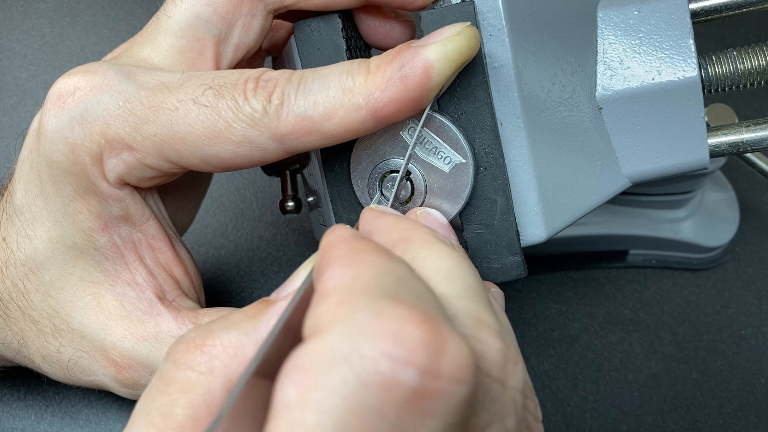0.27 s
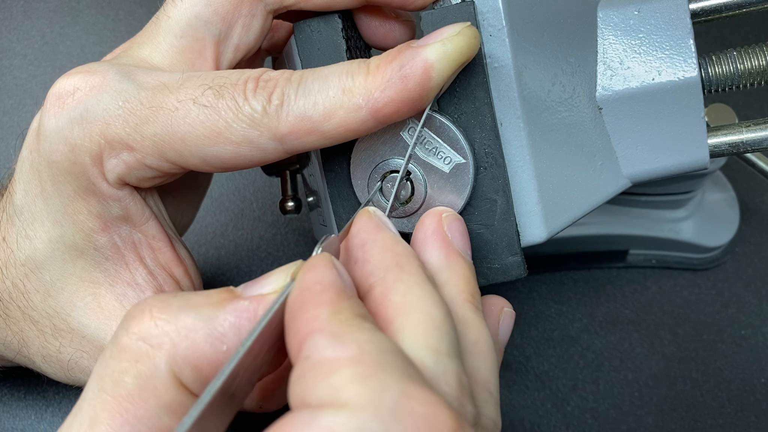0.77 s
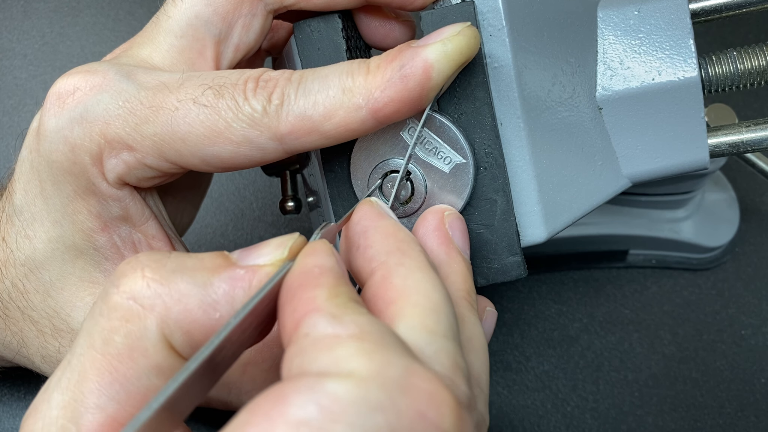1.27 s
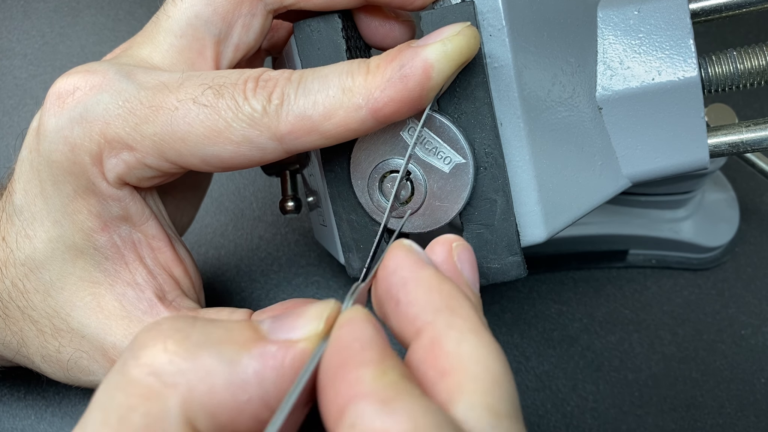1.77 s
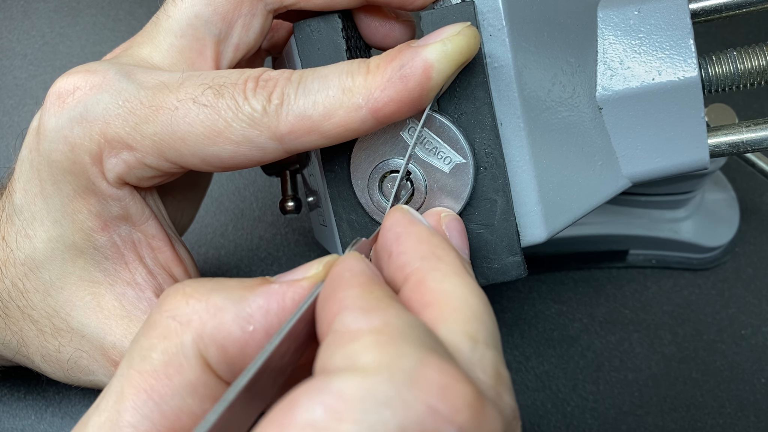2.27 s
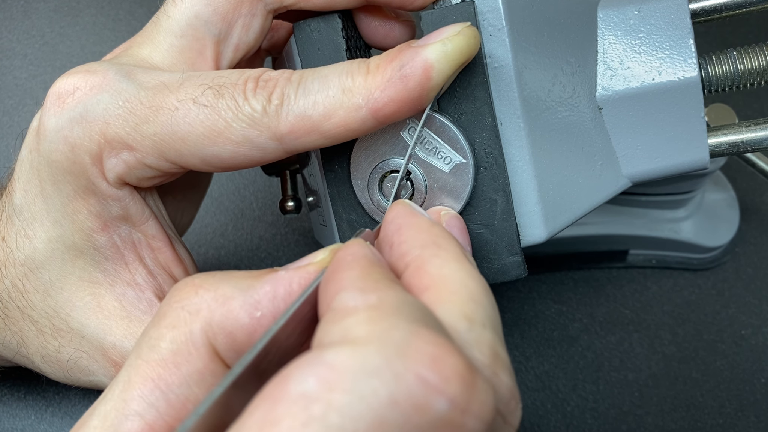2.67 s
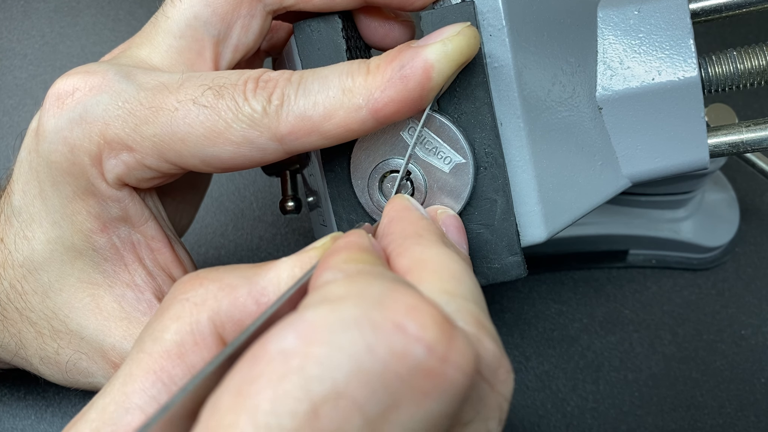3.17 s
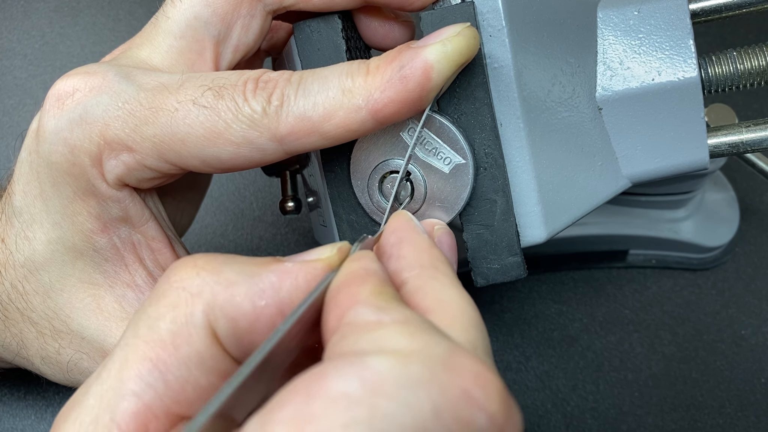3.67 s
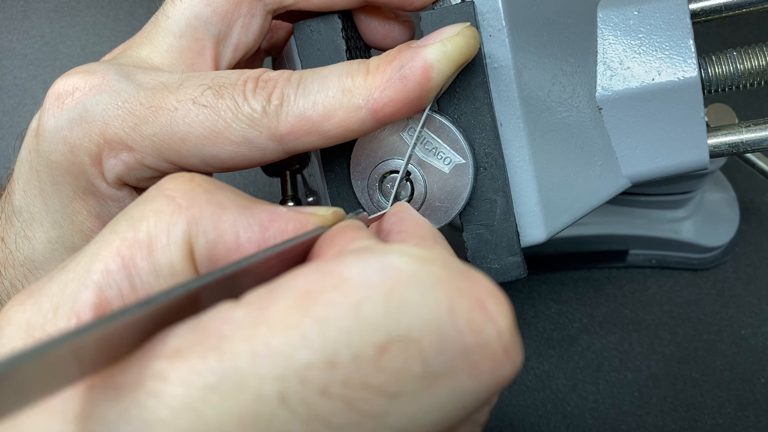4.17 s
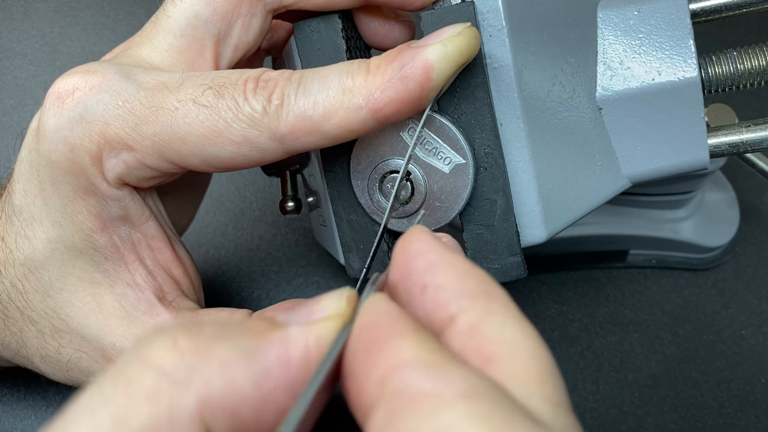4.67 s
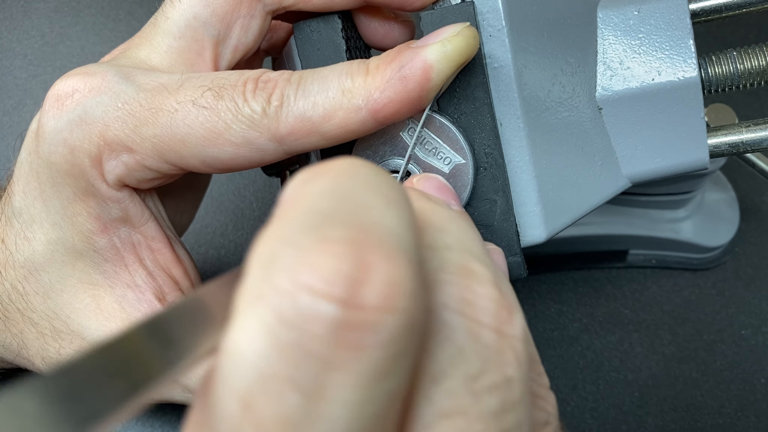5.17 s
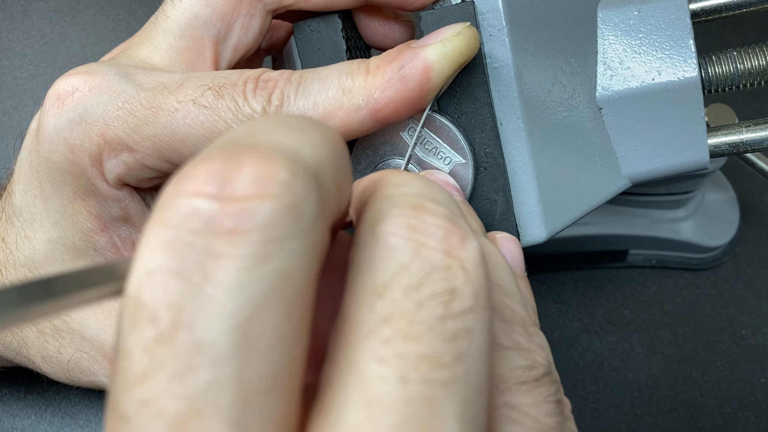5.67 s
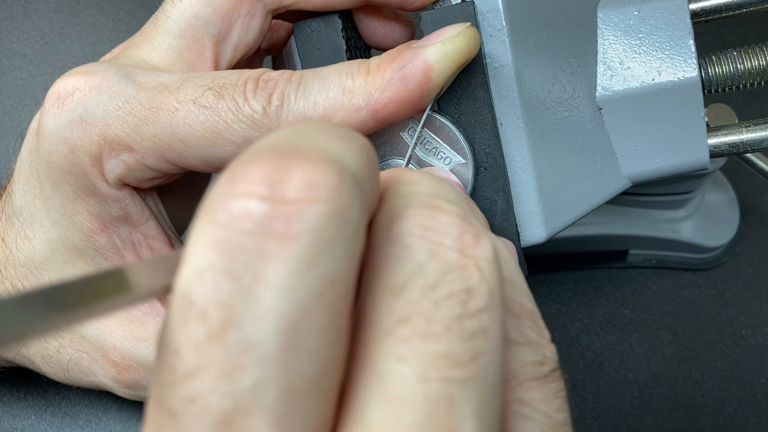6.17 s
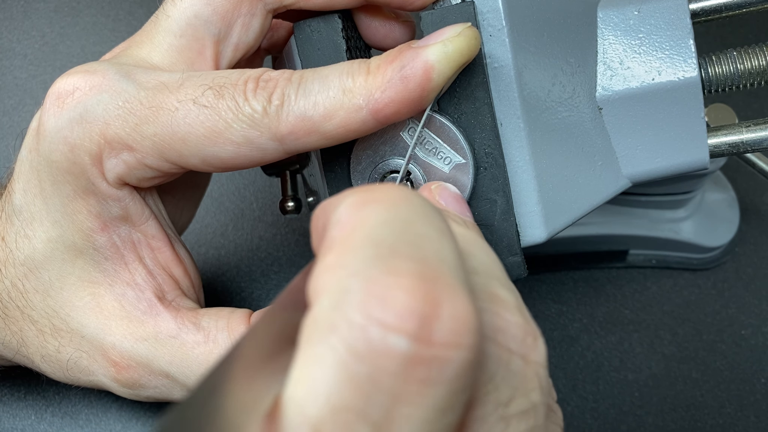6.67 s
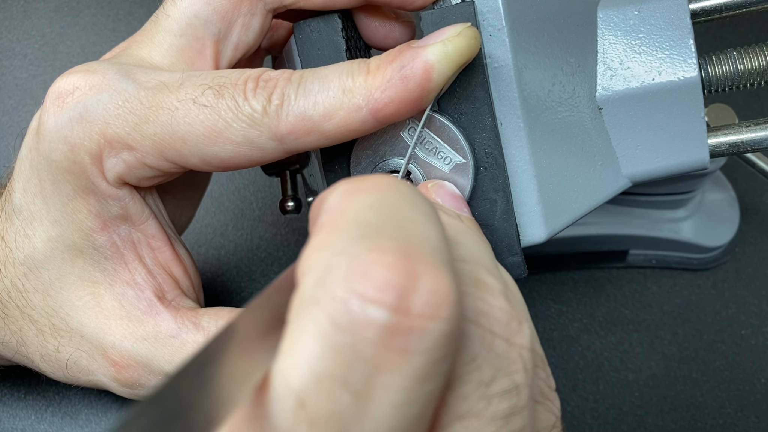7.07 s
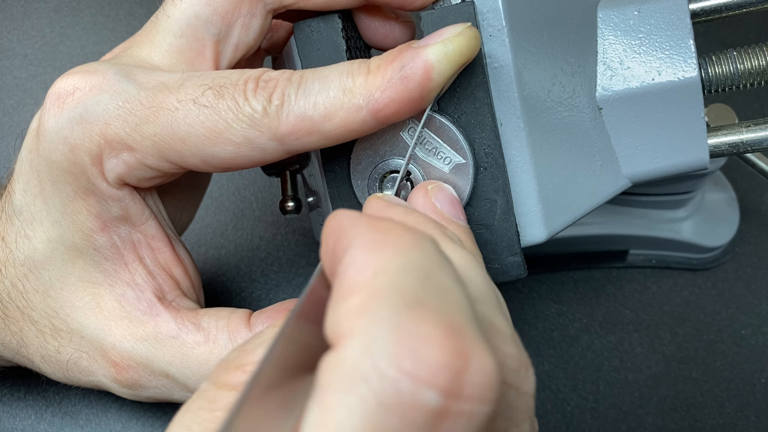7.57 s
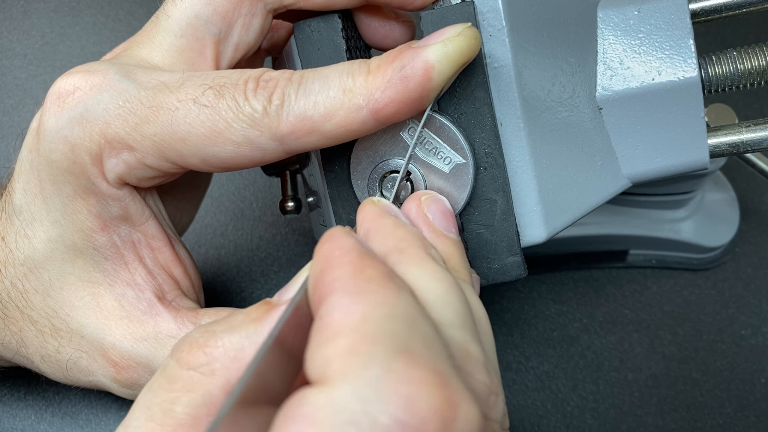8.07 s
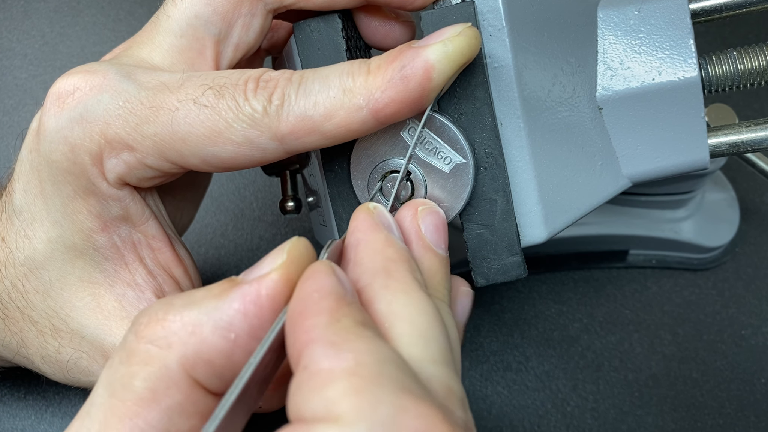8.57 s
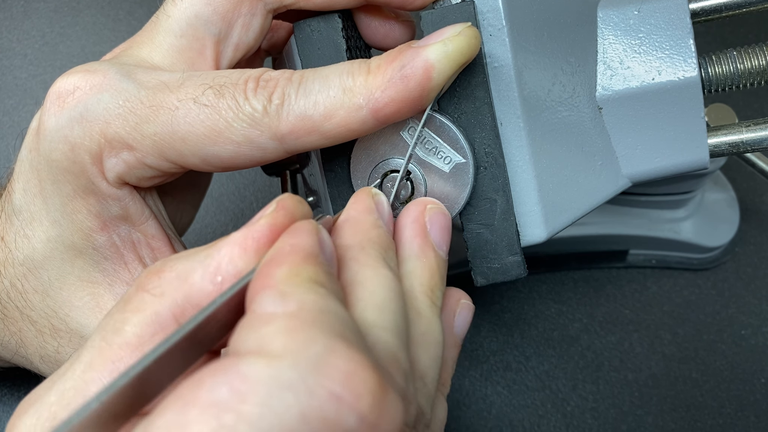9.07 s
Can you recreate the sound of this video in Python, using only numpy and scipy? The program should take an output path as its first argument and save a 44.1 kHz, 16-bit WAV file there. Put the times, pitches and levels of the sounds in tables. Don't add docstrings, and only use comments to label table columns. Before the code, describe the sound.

Small sharp lock clicks and tiny ticks come unevenly over a low bench rumble, with one heavy thump and then the loudest snap late on.

```python
import sys
import numpy as np
from scipy import signal
from scipy.fft import rfft, irfft
from scipy.io import wavfile
from scipy.ndimage import uniform_filter1d

SR = 44100
rng = np.random.default_rng(int(sys.argv[2]) if len(sys.argv) > 2 else 0)


def master_out(mix):
    frames = np.transpose(np.atleast_2d(mix))
    ceiling = np.clip(frames, -1, 1)
    pcm = np.round(ceiling * 32767).astype(np.int16)
    wavfile.write(sys.argv[1], SR, pcm)


def natural_amplitude(level_db):
    exponent = np.asarray(level_db, float) / 20
    return 10 ** exponent


N = 411453

# f/Hz, density/dB
AIR_SPECTRUM = [(59, -58), (100, -0.5), (126, -6.5), (163, -12.5), (238, -10.5), (306, -14.5), (603, -22),
                (919, -25.5), (1290, -27.5), (1590, -30.5), (15600, -38)]
SWAY_SPECTRUM = [(8.8, -22.5), (15, -1.5), (38, 1.5), (54, -9.5), (76, 0.5), (97, -17), (110, -21.5),
                 (140, -56), (240, -120)]
# f/Hz, width/Hz, level/dB
WHINE = (12750, 150, -96)
# t/s, level/dB
HAND_PRESSURE = [(0.0, -59.5), (0.26, -62), (0.57, -60), (1.01, -62.5), (1.32, -67), (2.41, -61.5),
                 (3.17, -65.5), (3.66, -57.5), (3.87, -63.5), (4.34, -65), (4.49, -50), (4.7, -63),
                 (5.9, -63), (6.21, -61), (6.65, -65), (7.51, -63.5), (7.74, -61), (9.33, -62)]
# f/Hz, level/dB, t60/s
TABLE_MODES = [(79, -16, 0.25), (122, 0, 0.24)]
STEEL_MODES = [(4080, -1, .004), (4900, -2, .003), (6100, -1, .005), (7000, -2, .004), (8250, -6, .003),
               (9500, -9, .003), (11500, -10, .003), (13200, -13, .003), (15000, -15, .003)]
LOCK_MODES = [(1290, -15, .01), (1498, -12, .012), (1611, -3, .028), (1860, -3, .012), (2032, -4, .015),
              (2320, -3, .01), (2600, -6, .008), (2976, -7, .01), (3265, -10, .008)]
VISE_MODES = [(466, -8.5, 0.049), (654, -7.5, 0.027), (814, 2.5, 0.017), (894.6, 7.5, 0.018),
              (969, -15.5, 0.09), (1014, -15, 0.054)]
STAND_MODES = [(79, 7, 0.027), (184.3, -8.5, 0.072), (212.3, 4.5, 0.047), (318, -7.5, 0.11),
               (344, -10, 0.04), (384, -1.5, 0.024)]
LEG_MODES = [(32.3, -1.5, 0.7), (56.3, 5.5, 0.3), (72.4, 8, 0.25)]
# f/Hz, t60/s
ROOM_DECAY = [(100, 0.43), (500, 0.29), (2000, 0.28), (6000, 0.23), (15000, 0.11)]
# t/s, vise level/dB, lock level/dB, steel level/dB, table level/dB
SETS = [(0.177, -54.5, -51.5, -83, -53.5), (0.3481, -47, -44.5, -43.5, -39),
        (0.9685, -51.5, -51.5, -59, -56), (1.348, -53.5, -51.5, -81, -53), (1.532, -54.5, -49, -44, -44),
        (1.96, -41.5, -50.5, -37, -42.5), (2.4215, -39.5, -40.5, -41.5, -40.5),
        (2.828, -58.5, -53, -71, -74), (3.5238, -39.5, -47.5, -46.5, -43.5),
        (3.5969, -33.5, -46, -41.5, -58), (3.9832, -44.5, -40.5, -52, -48.5), (4.331, -39, -40, -48.5, -41),
        (4.4996, -63, -60, -45.5, -40.5), (5.476, -40.5, -43, -48, -39.5), (5.801, -47.5, -46, -57, -45),
        (6.0565, -32, -38, -41, -22), (6.9678, -43.5, -42, -56.5, -44.5),
        (7.2396, -29, -21.5, -26.5, -21.5), (7.3625, -45, -41, -42, -43), (7.783, -47.5, -50.5, -52, -43.5),
        (8.0053, -54, -53.5, -94, -53), (8.2505, -52, -47, -50.5, -41), (8.752, -57.5, -51, -52, -41.5),
        (9.192, -53.5, -50.5, -41, -39.5)]
# t/s, vise level/dB, steel level/dB, table level/dB
REBOUNDS = [(0.2106, -59, -65, -60), (1.5652, -69, -56, -49), (2.0129, -43.5, -55, -54),
            (2.0632, -49, -73, -67), (2.0769, -60, -62, -61), (2.1106, -64, -54.5, -69),
            (3.5468, -58, -71, -46.5), (3.612, -62, -70, -52), (4.5053, -50.5, -64, -46),
            (6.106, -54, -81, -47), (6.1608, -64, -65, -38), (6.1807, -62, -72, -37),
            (7.255, -48, -47, -39), (7.3769, -51, -72, -36), (9.2305, -56.5, -46.5, -45)]
# t/s, vise level/dB, steel level/dB, stand level/dB
TOUCHES = [(0.5361, -72, -66, -63.5), (0.6993, -71, -61, -67), (0.8132, -71, -62, -72),
           (0.8878, -56, -72, -57), (0.922, -61, -79, -71), (1.0789, -54, -68, -57),
           (1.1491, -56, -67, -62), (1.255, -59, -72, -58), (1.623, -61.5, -57, -66),
           (2.867, -71, -80, -72), (2.975, -66.5, -88, -81), (3.4987, -63, -58, -67),
           (5.242, -62, -66, -56), (5.6344, -66, -62, -58.5), (5.7275, -59.5, -58, -68),
           (5.888, -63, -81, -75), (6.2724, -79, -74, -71), (6.703, -65, -59, -61.5),
           (7.7042, -61, -85, -73), (8.1115, -66.5, -68, -66), (8.203, -64.5, -85, -64),
           (8.5733, -61.5, -59, -48.5), (8.6637, -61.5, -62, -59), (8.707, -58.5, -65, -50.5),
           (8.9083, -57, -63, -56), (8.947, -60.5, -62, -56), (9.0664, -62.5, -69, -67)]
# t/s, level/dB
GRAZES = [(0.2114, -52), (0.3844, -57), (1.5678, -50), (3.498, -56), (4.3253, -45.5), (4.503, -40),
          (4.535, -50), (5.0452, -56), (5.165, -44), (6.272, -51.5), (6.4094, -72), (6.4378, -58),
          (6.702, -49), (6.052, -59), (3.593, -56), (7.238, -43), (7.784, -44), (8.4394, -59), (9.19, -59),
          (9.229, -43.5)]
# t/s, leg level/dB, stand level/dB
JOLTS = [
    (0.348, -51, -52),
    (2.42, -51, -62),
    (3.973, -49.5, -60),
    (4.323, -39, -39.5),
    (4.498, -42, -56),
    (5.171, -51.5, -59.5),
    (6.05, -30.5, -46),
    (7.236, -42.5, -32),
    (8.743, -44, -53.5),
    (9.19, -41.5, -52),
]
# t/s, length/s, vise level/dB, steel level/dB
DRAGS = [
    (1.506, .12, -74, -86),
    (1.951, 0.13, -48.5, -73),
    (2.057, 0.026, -70, -67),
    (2.103, 0.027, -73, -68),
    (3.442, 0.12, -74, -71.5),
    (3.497, 0.098, -60.5, -89),
    (3.585, 0.097, -68, -78),
    (4.497, 0.055, -63.5, -68),
    (8.72, .08, -66, -82),
    (9.186, 0.13, -79, -75),
]

LEAD = 110


def evened(x):
    return x / np.sqrt(np.mean(x ** 2) + 1e-20)


def read(points, hz):
    f, value = np.transpose(points)
    return np.interp(np.log(hz + 1), np.log(f + 1), value, left=value[0], right=value[-1])


def add(mix, s, sound):
    part = mix[max(round(s * SR), 0):][:len(sound)]
    part += sound[:len(part)]


def ring(modes, seconds, chance, spread_db, rise, detune=0.0031):
    t = np.arange(round(seconds * SR)) / SR
    hz, db, t60 = np.transpose(modes)[:, :, None]
    share, shift = chance[:2 * len(modes)].reshape(2, -1, 1)
    decay = natural_amplitude(db + spread_db * share - 60 * t / t60)
    out = (decay * np.sin(2 * np.pi * hz * (1 + detune * shift) * t)).sum(0)
    out = out * (1 - np.exp(-t / rise))
    return out / abs(out).max()


def coloured(spectrum):
    hz = np.fft.rfftfreq(N, 1 / SR)
    noise = rfft(rng.standard_normal(N))
    return evened(irfft(noise * natural_amplitude(read(spectrum, hz)), N))


def air():
    return natural_amplitude(-66) * coloured(AIR_SPECTRUM)


def whine():
    hz, width, db = WHINE
    return natural_amplitude(db) * coloured([(hz - 3 * width, -60), (hz, 0), (hz + 3 * width, -60)])


def fidget():
    size = round(0.11 * SR)
    return evened(uniform_filter1d(uniform_filter1d(rng.standard_normal(N), size), size))


def bench():
    press_db = np.interp(np.arange(N) / SR, *np.transpose(HAND_PRESSURE))
    table = ring(TABLE_MODES, 0.33, np.zeros(4), spread_db=0, rise=0.0024)
    hum = evened(signal.oaconvolve(rng.standard_normal(N), table)[:N])
    sway = coloured(SWAY_SPECTRUM) * natural_amplitude(press_db + 1.5 + fidget())
    hum_db = -68.5 + 0.35 * (press_db - press_db.mean()) + 3.5 * fidget()
    return sway + hum * natural_amplitude(hum_db)


def chatter(body, grit, length, first, tail_db):
    t = np.arange(len(grit)) / SR
    burst = (1 - np.exp(-t / 0.0028)) * np.exp(-t / length)
    rattle = natural_amplitude(tail_db) * np.exp(-t / 0.016)
    drive = grit * abs(grit) * (burst + rattle)
    drive[LEAD] += first * np.linalg.norm(drive)
    drive[:LEAD] *= natural_amplitude(-9)
    out = signal.fftconvolve(body, drive)
    return out / abs(out).max()


def slips():
    rows = []
    for s, vise, lock, steel, table in SETS:
        stand = vise + 0.71 * (table - vise) - 4
        rows.append((s, lock, table, stand, vise, steel))
    for s, vise, steel, table in REBOUNDS:
        stand = vise + 0.7 * (table - vise) - 4
        rows.append((s, vise - 5, table, stand, vise, steel))
    for s, vise, steel, stand in TOUCHES:
        rows.append((s, vise - 3, stand - 2, stand, vise, steel))
    return sorted(rows)


def click(row, chance, grit):
    s, lock_db, table_db, stand_db, vise_db, steel_db = row
    out = np.zeros(round(.62 * SR))

    steel = ring(STEEL_MODES, .015, chance, spread_db=1.5, rise=.0001, detune=.05)
    add(out, 0, natural_amplitude(steel_db + 4.5) * chatter(steel, grit, length=0.0029, first=0.8, tail_db=-17.0))

    lock = ring(LOCK_MODES, .07, chance[20:], spread_db=1.5, rise=0.00016, detune=0.014)
    add(out, .0006, natural_amplitude(lock_db + 5.0) * chatter(lock, grit[::-1], length=0.0046, first=0.65, tail_db=-22))

    vise = ring(VISE_MODES, 0.16, chance[40:], spread_db=1.5, rise=0.0028)
    add(out, .0005, natural_amplitude(vise_db + 6.0) * chatter(vise, -grit, length=0.0018, first=1.49, tail_db=-13.5))

    stand = ring(STAND_MODES, .25, chance[52:], spread_db=3.5, rise=0.0023)
    add(out, .0011, -natural_amplitude(stand_db + 5) * stand)

    table = ring(TABLE_MODES, .6, chance[64:], spread_db=4.5, rise=0.014)
    add(out, .014, natural_amplitude(table_db) * table)
    return s - .0007 - (LEAD - 40) / SR, out


def pins():
    mix, rows = np.zeros(N), slips()
    chance = rng.standard_normal((len(rows), 70 + 2600))
    for row, c in zip(rows, chance):
        add(mix, *click(row, c[:70], c[70:]))
    return mix


def tail():
    taps = np.zeros(SR // 2)
    at = np.arange(200, len(taps) - 20, 20)
    taps[at + rng.integers(0, 20, len(at))] = rng.choice([-1., 1.], len(at))
    hz, t, z = signal.stft(taps, SR, nperseg=256)
    decay = natural_amplitude(-60 * t / read(ROOM_DECAY, hz)[:, None])
    out = signal.istft(z * decay, SR, nperseg=256)[1]
    return out / np.linalg.norm(out)


def room(x):
    turn = 2 * np.pi * np.arange(N) / SR * 1.37
    return sum(signal.oaconvolve(x * feed, tail())[:N] for feed in (np.sin(turn), np.cos(turn)))


def grazes():
    mix = np.zeros(N)
    tip = ring(STEEL_MODES[2:], .006, np.zeros(20), spread_db=0, rise=.0001)
    tip = np.diff(tip, 3)
    for (s, db), grit in zip(GRAZES, rng.standard_normal((len(GRAZES), 1500))):
        add(mix, s - LEAD / SR, natural_amplitude(db) * chatter(tip, grit, length=0.0036, first=.6, tail_db=-18))
    return mix


def jolts():
    mix = np.zeros(N)
    for (s, leg_db, stand_db), chance in zip(JOLTS, rng.standard_normal((len(JOLTS), 6))):
        add(mix, s, natural_amplitude(leg_db) * ring(LEG_MODES, 0.23, chance, spread_db=-1.5, rise=.012))
        add(mix, s, natural_amplitude(stand_db) * ring(STAND_MODES[1:4], .15, chance, spread_db=0.5, rise=.003))
    return mix


def drags():
    size = natural_amplitude(0.75 * np.minimum(rng.exponential(1, N), 4))
    happens = rng.random(N) < 1500 / SR
    grit = size * happens * rng.choice([-1., 1.], N)
    still = np.zeros(70)
    jaws = ring(VISE_MODES[1:] + LOCK_MODES[:2], .1, still, spread_db=0, rise=0.00024)
    steel = ring(STEEL_MODES, .02, still, spread_db=0, rise=0.00016)
    dull = evened(signal.oaconvolve(grit, jaws)[:N])
    bright = evened(signal.oaconvolve(grit, steel)[:N])
    mix = np.zeros(N)
    for s, length, vise_db, steel_db in DRAGS:
        span = slice(round(s * SR), round((s + length) * SR))
        sound = dull[span] * natural_amplitude(vise_db) + bright[span] * natural_amplitude(steel_db)
        stroke_db = np.interp(np.linspace(0, 1, len(sound)), [0, 0.18, 1], [-17, 0, -5])
        add(mix, s, sound * natural_amplitude(stroke_db) * signal.windows.tukey(len(sound), .15))
    return mix


def scene():
    near = pins() + grazes() + drags()
    mix = near + natural_amplitude(-15.5) * room(near)
    mix = mix + jolts() + air() + whine() + bench()
    return mix[None]


def low_pass(x):
    return signal.sosfilt(signal.butter(12, 16500, fs=SR, output="sos"), x)


def record(dry):
    edge = signal.firwin(301, 15900, window=("kaiser", 5), fs=SR)[None]
    passed = signal.oaconvolve(dry, edge, "same")
    mix = passed + natural_amplitude(-41) * (dry - passed)
    return low_pass(mix)


dry = scene()
out = record(dry)
master_out(out)
```